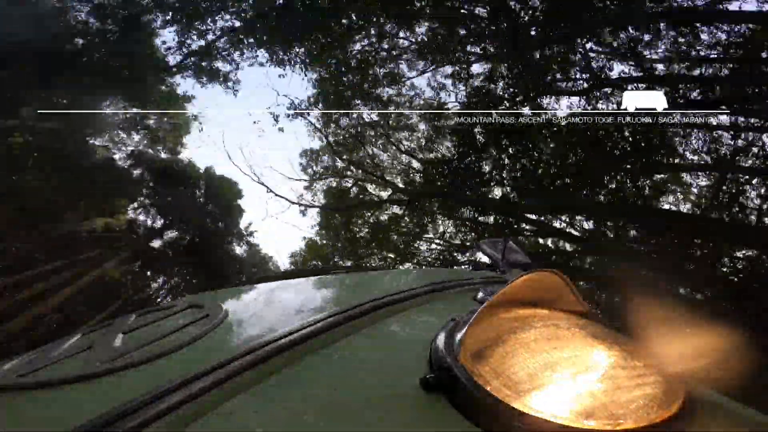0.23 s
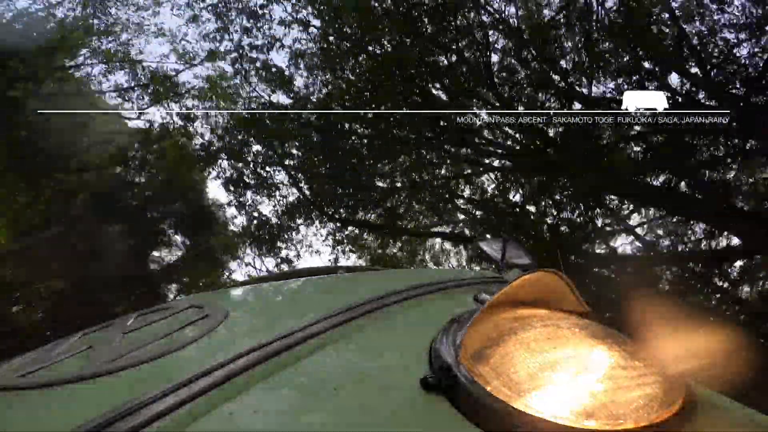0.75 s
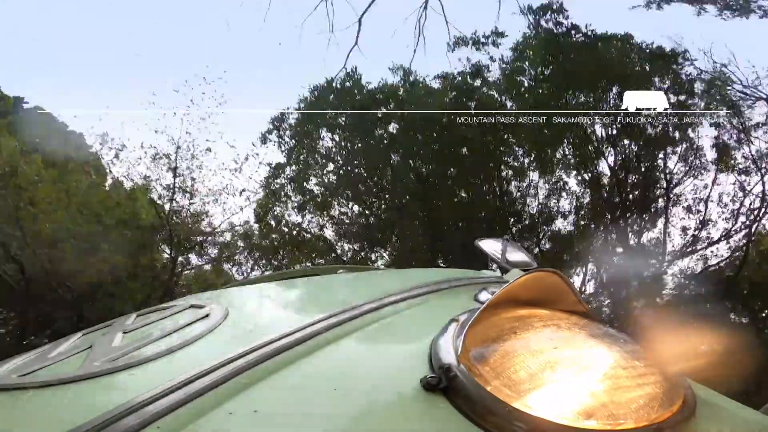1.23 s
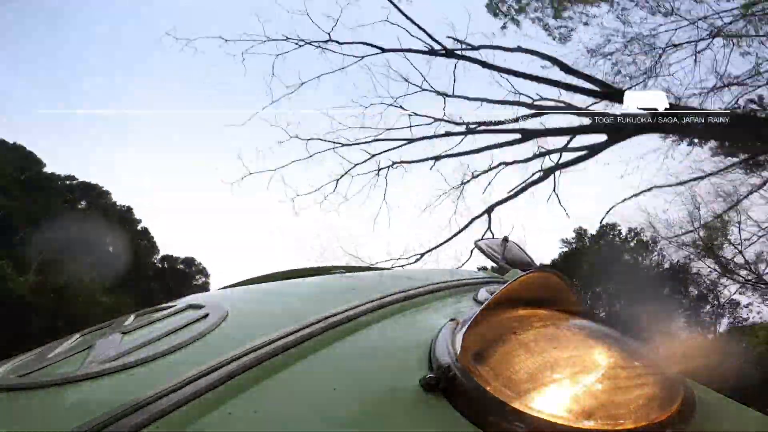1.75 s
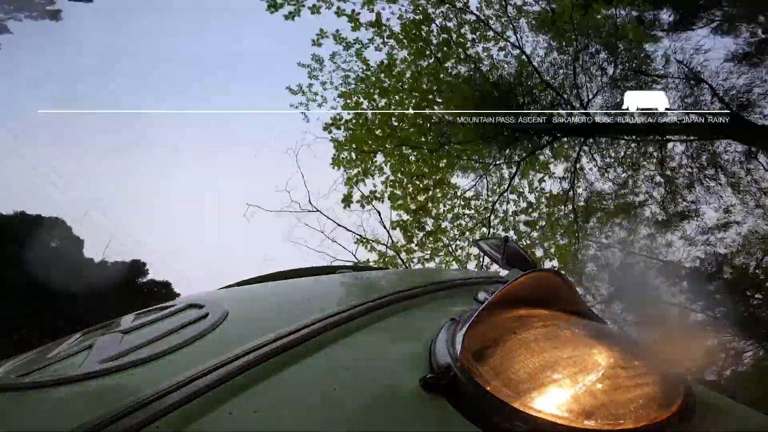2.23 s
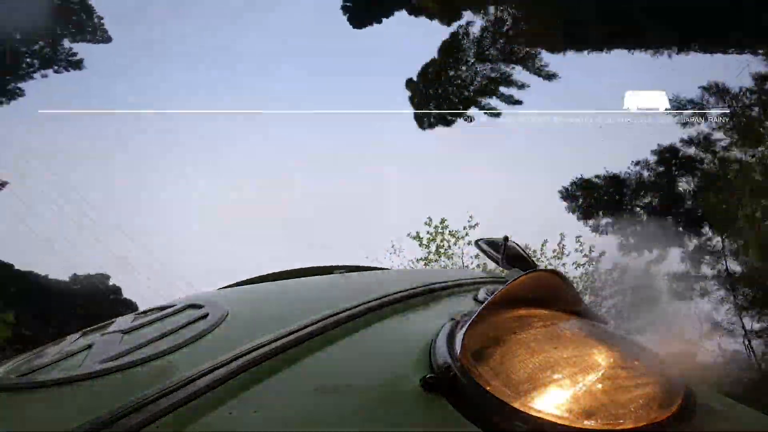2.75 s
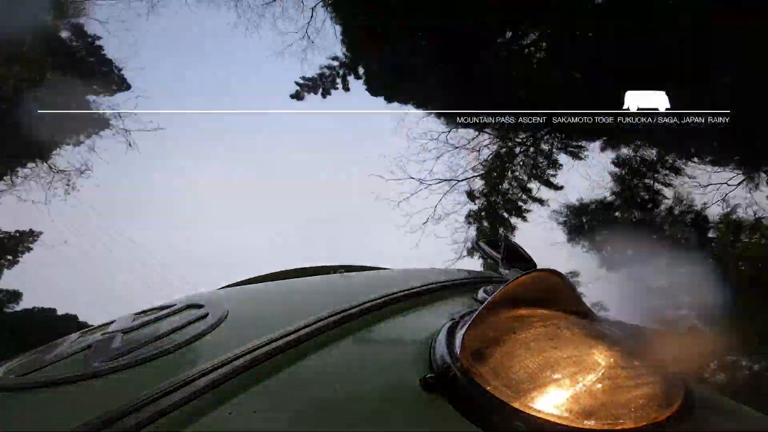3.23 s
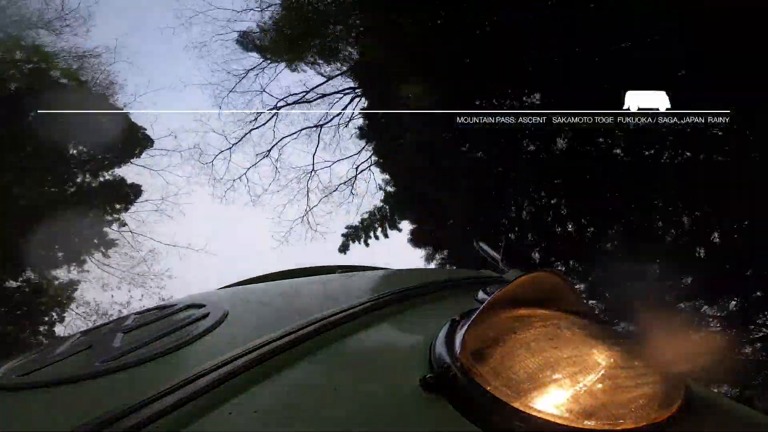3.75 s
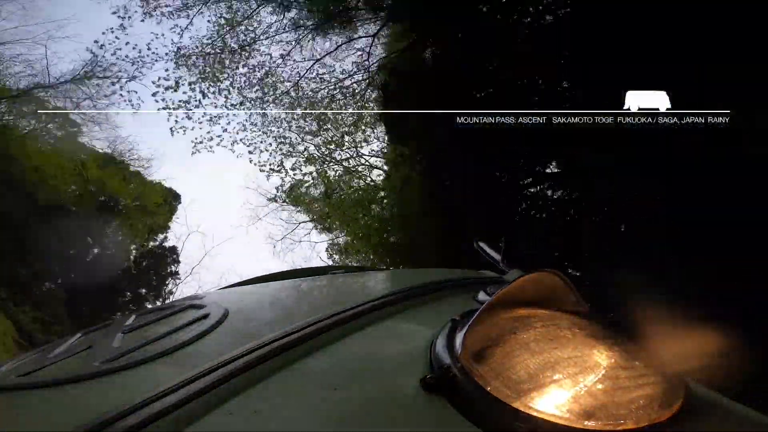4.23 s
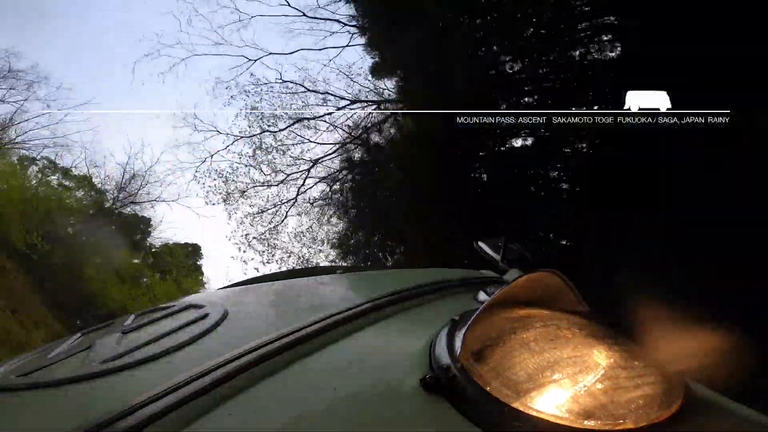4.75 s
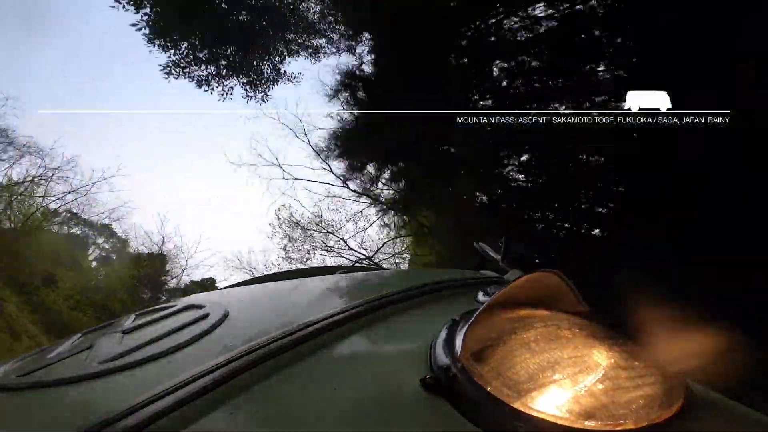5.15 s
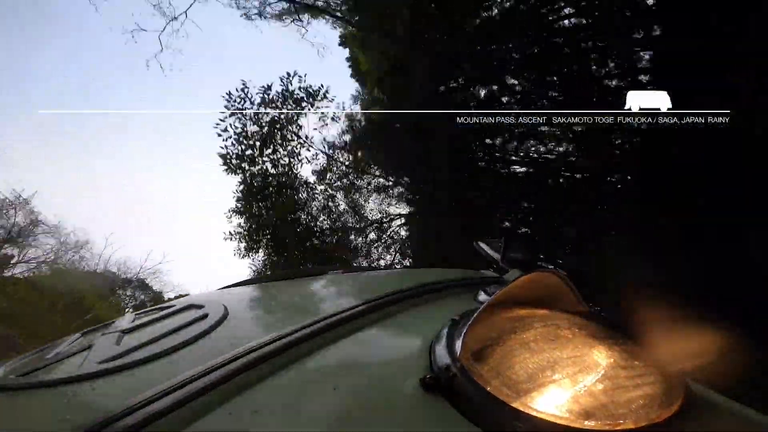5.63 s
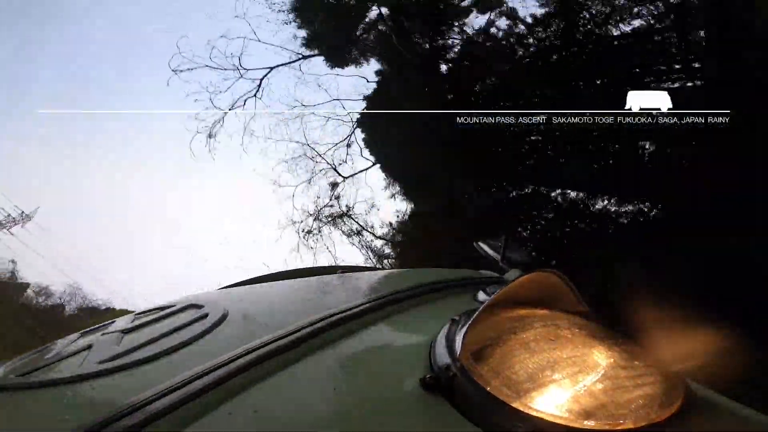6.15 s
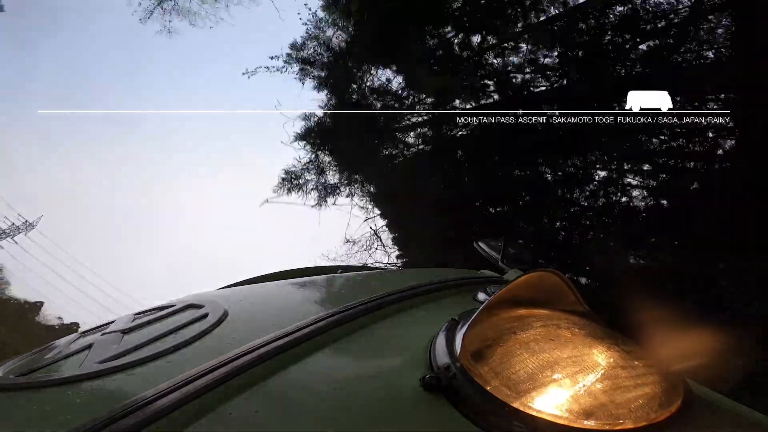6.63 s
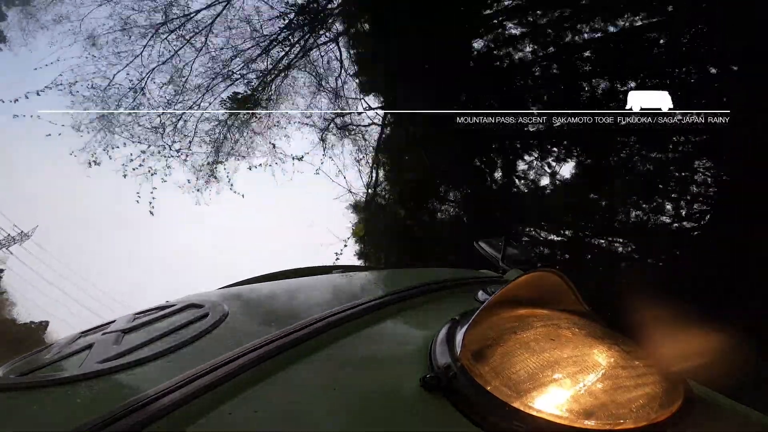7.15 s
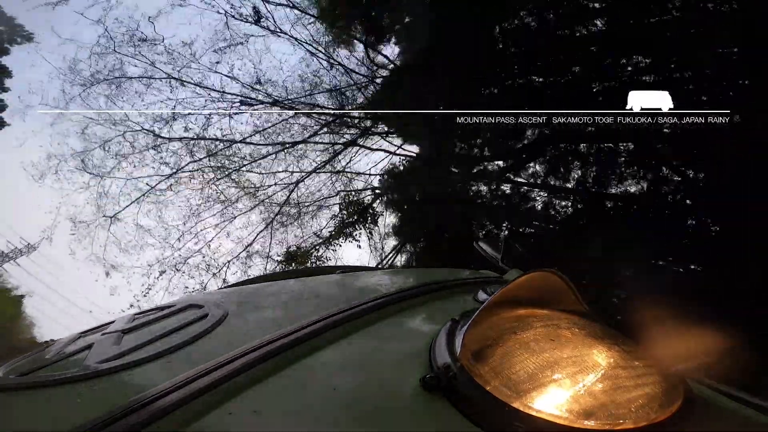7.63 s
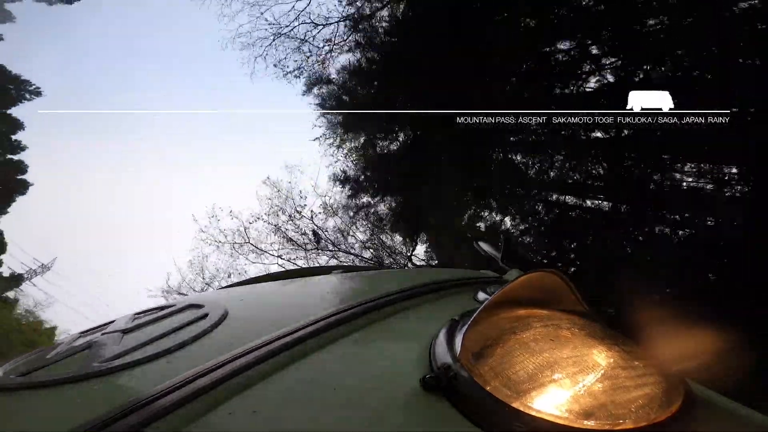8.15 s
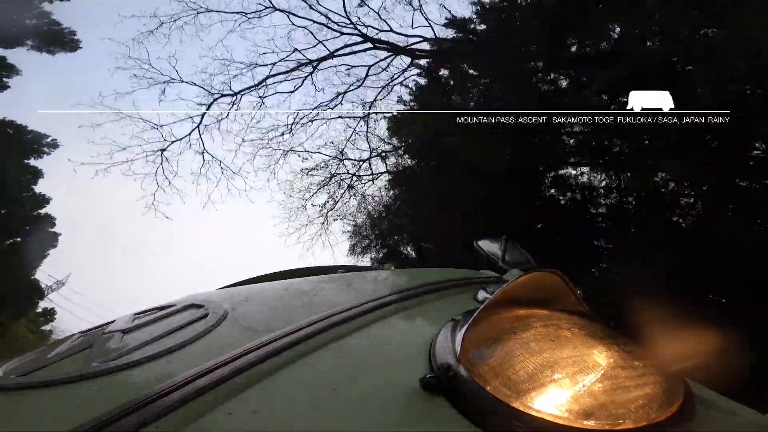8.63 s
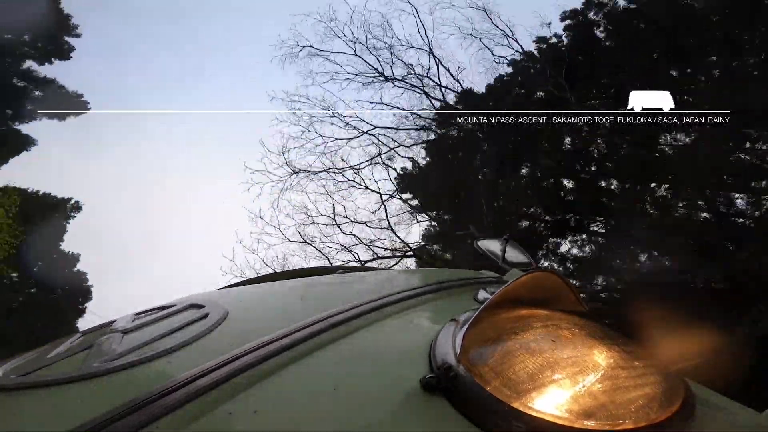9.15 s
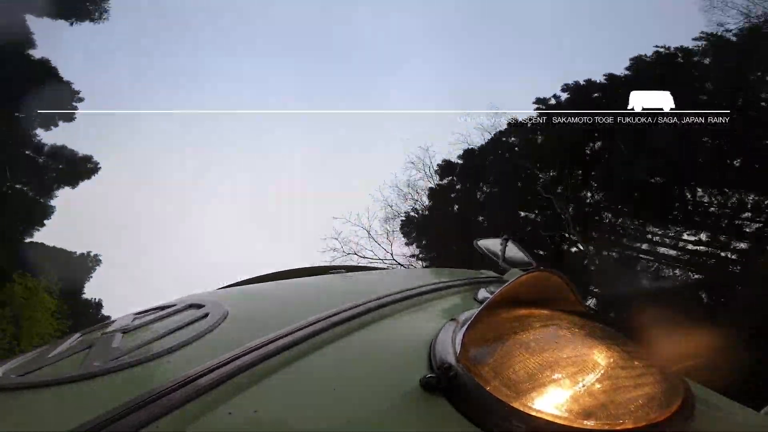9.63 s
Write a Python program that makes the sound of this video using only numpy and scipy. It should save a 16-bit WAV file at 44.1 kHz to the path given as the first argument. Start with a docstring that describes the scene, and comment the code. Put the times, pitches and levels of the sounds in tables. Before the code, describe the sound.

An old air-cooled bus drives along a mountain road, heard from its nose with the engine at the far end. The engine drones and pulls hard for a second, then a loud, dull driveline knock comes as the throttle shuts. The revs sink through a burble until the engine lugs, with separate muffler thumps, rhythmic chuffs from a leaky exhaust and light ticking. Fan and tyre rush and road rumble run underneath.

```python
"""Old bus on a mountain road

Microphone at the nose, a bus length from the air-cooled flat four. It coasts, pulls hard for a second,
then the revs sink until it lugs and gently bucks: the exhaust burbles, its drone breaks into muffler
thumps, and one cylinder bank chuffs through a leaky joint once a turn, over the rush of fan and tyres.
A driveline knock as the throttle shuts ducks the recorder's limiter."""
import sys
import numpy as np
from scipy import signal
from scipy.fft import rfft, irfft, next_fast_len
from scipy.io import wavfile
from scipy.ndimage import uniform_filter1d, map_coordinates

SR = 44100
rng = np.random.default_rng(int(sys.argv[2]) if len(sys.argv) > 2 else 0)


def pcm_store(signal):
    """Save signal as 16-bit PCM."""
    levels = np.round(np.clip(np.atleast_2d(signal), -1, 1) * 32767)
    wavfile.write(sys.argv[1], SR, levels.astype(np.int16).T)


N = 435692
T = np.arange(N) / SR


def from_db(db):
    """Decibels to gain."""
    return 10 ** (np.asarray(db) / 20)


def rms_one(x):
    """Scale to unit power."""
    return x / np.sqrt(np.mean(x ** 2) + 1e-20)


def even(x, size=12000):
    """Hold unit power over every stretch of a few engine turns."""
    return x / np.sqrt(uniform_filter1d(uniform_filter1d(x ** 2, size), size // 2) + 1e-12)


def in_time(rows):
    """Each column of a timed curve at every sample."""
    times, *columns = np.transpose(rows)
    return [np.interp(T, times, column) for column in columns]


def drift(rate):
    """Smooth random wander of spread 1 that changes about rate times a second."""
    wander = map_coordinates(rng.standard_normal(8192), [T[::20] * rate + 2], order=3, mode="wrap")
    return rms_one(wander).repeat(20)[:N]


def coloured(spectrum):
    """Noise of unit power with the given spectrum, rolled off beyond its ends."""
    hz, level_db = np.transpose(spectrum)
    size = next_fast_len(N)
    f = np.arange(1, size // 2 + 2) * SR / size
    skirts = 1 / (1 + (hz[0] / f) ** 4) / (1 + (f / (2 * hz[-1])) ** 4)
    gain = from_db(np.interp(np.log(f), np.log(hz), level_db)) * skirts
    return rms_one(irfft(rfft(rng.standard_normal(size)) * gain, size)[:N])


def resonate(x, modes):
    """Ring parallel resonances with alternating signs."""
    out = 0
    for k, (hz, width_hz, level_db) in enumerate(modes):
        r = np.exp(-np.pi * width_hz / SR)
        poles = [1, -2 * r * np.cos(2 * np.pi * hz / SR), r * r]
        ring = signal.lfilter([1, 0, -1], poles, x + 1e-18) * (1 - r * r) / 2
        out = out + (-1) ** k * from_db(level_db) * ring
    return out


def band(x, low_hz, high_hz):
    """Gentle band-pass."""
    return signal.sosfilt(signal.butter(2, [low_hz, high_hz], "band", fs=SR, output="sos"), x)


def puffs(crank, strength_db, delay, width, scatter_db):
    """One smooth puff a firing, of its cylinder's strength plus chance; delay and width in firings."""
    angle = crank - delay + .5
    stroke = np.floor(angle).astype(int)
    chance_db = scatter_db * np.clip(rng.standard_normal(1024), -2, 2)
    shape = np.exp(-.5 * ((angle - stroke - .5) / width) ** 2)
    return shape * from_db(np.take(strength_db, stroke, mode="wrap") + chance_db[stroke])


def linger(flow, tail_s, share):
    """A share of the energy echoes on between the underbody and the road."""
    r = np.exp(-1 / (tail_s * SR))
    echo = signal.lfilter([1 - r], [1, -r], flow ** 2)
    return np.sqrt((1 - share) * flow ** 2 + share * echo)


def jolts(events, modes, decay_s, trim_db, size=6000):
    """Each jolt is a short, dying burst of noise that rings the given resonances."""
    out, envelope = np.zeros(N + size), np.exp(-T[:size] / decay_s)
    for time_s, level_db in events:
        ring = resonate(rng.standard_normal(size) * envelope, modes)
        start = int(time_s * SR)
        out[start:start + size] += from_db(level_db + trim_db) * np.std(envelope) * rms_one(ring)
    return out[:N]


# Low, gusty rumble at the microphone: (frequency [Hz], relative density [dB])
RUMBLE_SPECTRUM = [(15, -17), (30, 3), (45, -2), (70, -0.5), (110, -9.5), (300, -31.5)]


def rumble(load, swell_db):
    """A low rumble gusts, swelling with the tyre rush and dipping under load."""
    return from_db(-22 - 4.5 * load + .74 * swell_db) * coloured(RUMBLE_SPECTRUM)


# Running gear under the floor: (time [s], pitch [Hz], level [dB])
HOWL_TRACK = [(0, 950, -41), (.4, 925, -48), (.55, 925, -35), (.65, 916, -51), (1.6, 919, -47),
              (2.3, 920, -48), (3.2, 873, -43), (4.3, 842, -41), (5.6, 811, -49), (6.5, 773, -54)]


def howl(width_hz=55):
    """A breathy howl of the running gear sinks as the bus slows."""
    hz, level_db = in_time(HOWL_TRACK)
    angle = 2 * np.pi * np.cumsum(hz) / SR
    return from_db(level_db) * (drift(width_hz) * np.cos(angle) + drift(width_hz) * np.sin(angle))


# Gears, faint from the nose: (time [s], pitch [Hz], level [dB])
WHINE_TRACK = [(0, 2020, -33.5), (.12, 1925, -36), (.35, 1845, -41), (.6, 1810, -48), (4, 1780, -58)]


def whine(wobble_rad=.25):
    """A thin, unsteady gear whine falls and fades."""
    hz, level_db = in_time(WHINE_TRACK)
    angle = 2 * np.pi * np.cumsum(hz) / SR
    return from_db(level_db - drift(40)) * np.sin(angle + wobble_rad * drift(60))


# Air over the fins at the far end of the bus: (frequency [Hz], relative density [dB])
AIR_SPECTRUM = [(2000, -20), (2800, 17.5), (3350, 4.5), (3900, 9.5), (4700, 3.5), (5600, 5.5), (7200, 1),
                (10000, -5.5), (12500, -3), (15500, -13)]


def cooling_air(load, lugging, swell_db, treble_db, flutter_db=3.5):
    """Air hisses over the fins and swells with the fan; its share of the treble peaks when coasting."""
    share_db = -1.5 - 7 * lugging ** 2 - 6.5 * load + .56 * swell_db
    return from_db(treble_db + share_db + flutter_db * drift(150)) * coloured(AIR_SPECTRUM)


# Fan and tyre rush at the microphone: (time [s], level [dB])
RUSH_TRACK = [(0, -30.5), (.45, -31), (.9, -33), (1.65, -30), (1.9, -32.5), (2.4, -29.5), (3.1, -26.5),
              (3.7, -29), (4.3, -31.5), (5.7, -33.5), (6.8, -33.5), (8, -34.5), (9.5, -36), (9.8, -35)]
# Its colour from the nose: (frequency [Hz], relative density [dB])
RUSH_SPECTRUM = [(300, 6), (480, -1.5), (620, -6), (740, -4.5), (980, -0.5), (1120, -6), (1300, -5.5),
                 (1650, -10.5), (1800, -6.5), (2300, -13), (2850, -12), (3300, -19.5), (4500, -19.5),
                 (9000, -32.5)]


def fan_and_tyres(crank, load, rush_db, throb=.042, flutter_db=.9):
    """Fan and tyres rush, throbbing a little with the crank and pulsing at every firing under load."""
    beat = np.exp(throb * puffs(crank, CHUFF_DB, delay=.19, width=.18, scatter_db=7))
    pulse_db = 1.7 * load * np.cos(2 * np.pi * (crank - .35))
    rush = coloured(RUSH_SPECTRUM) * beat * from_db(pulse_db + flutter_db * drift(120))
    return from_db(rush_db + 1) * even(rush)


# Thuds through the body behind the microphone, the first as the throttle opens: (time [s], relative level [dB])
BODY_THUDS = [(0.508, -4), (3.725, -6), (6.427, -8), (9.687, -14), (9.729, -16)]


def thuds():
    """Thuds jolt the body, ringing its shell, panels and exhaust."""
    return jolts(BODY_THUDS, BODY_MODES + PANEL_MODES + BURBLE_MODES, decay_s=.01, trim_db=-7)


# The eight valves in turn: (relative tick level [dB])
VALVE_TICKS_DB = [0, -4, -2, -11, -9, -16, 3, -11]
# Ring of the valve gear: (frequency [Hz], width [Hz], gain [dB])
VALVE_MODES = [(4770, 250, 12), (5540, 350, 9), (7350, 200, -9), (11500, 400, -23)]


def tappets(crank, lugging, treble_db):
    """Valve gear ticks unevenly with a thin ring, twice a firing, standing out as the revs fall."""
    ticks = puffs(2 * crank, VALVE_TICKS_DB, delay=.24, width=.1, scatter_db=1.8)
    hiss = coloured(HISS_SPECTRUM)
    ring = from_db(-4) * rms_one(resonate(rng.standard_normal(N), VALVE_MODES))
    ticking = linger(ticks, tail_s=.0055, share=1) * (hiss + ring)
    return from_db(treble_db - 17.5 + 6 * lugging) * even(ticking)


def tinware_rattle(crank, rush_db):
    """Strong firings knock the engine's tinware."""
    blows = puffs(crank, CHUFF_DB, delay=.83, width=.07, scatter_db=1.2)
    tin = band(rng.standard_normal(N), 845, 1520)
    return from_db(rush_db - 10.5) * rms_one(linger(blows, tail_s=.0067, share=.52) * tin)


# Clacks that carry from the engine bay: (time [s], relative level [dB])
TIN_CLACKS = [(1.141, -18), (3.725, -19.5), (4.1699, -29), (5.0226, -25.5), (6.5841, -25), (7.504, -24),
              (7.9704, -22), (9.1468, -19), (9.2216, -22), (9.7289, -18.5)]
# Sheet metal around the engine: (frequency [Hz], width [Hz], gain [dB])
TIN_MODES = [(1240, 200, 2), (1550, 160, -1.5), (1920, 400, -14)]


def tinware_clacks():
    """Now and then the tinware gives one loud clack."""
    return jolts(TIN_CLACKS, TIN_MODES, decay_s=.0055, trim_db=-3.5)


def driveline_knock(time_s=2.0795, width_s=.0015):
    """One dull, full-scale knock as the gears take up their slack."""
    swing = ((T - time_s) / width_s) ** 2
    return (swing - 1) * np.exp(-swing / 2)


# Shell and panels between engine and microphone: (frequency [Hz], width [Hz], gain [dB])
BODY_MODES = [(143.7, 47, -5), (215.1, 25.3, 0), (271, 59, -9)]
PANEL_MODES = [(369, 28, 0.5), (428.7, 31.4, 0), (487, 18, -8)]


def boom(crank, lugging, level_db, modes, turbulence=.11):
    """Gas blows, each with its own turbulence, shake the given resonances."""
    blows = puffs(crank + .004 * drift(40), THUMP_DB, delay=.6, width=.025, scatter_db=.7)
    gusts = puffs(crank, THUMP_DB, delay=.57, width=.18, scatter_db=.7)
    swirl = (turbulence * gusts + .028) * rms_one(band(rng.standard_normal(N), 72, 700))
    # only slow firings land as separate blows; faster ones merge into a roar
    shake = resonate(.35 * lugging ** 2 * blows + swirl, modes)
    return from_db(level_db) * even(band(shake, 130, 480))


# Hollow notes of the exhaust: (frequency [Hz], width [Hz], gain [dB])
BURBLE_MODES = [(238, 24, 6), (312, 32, -5)]


def burble(crank, firing_hz, load, peak_hz=48, span_hz=10):
    """With the throttle shut and the revs sinking, one bank burbles in the exhaust."""
    overrun = (1 - load) * np.exp(-.5 * ((firing_hz - peak_hz) / span_hz) ** 2)
    blows = puffs(crank + .04 * drift(40), BURBLE_DB, delay=.5, width=.04, scatter_db=1.5)
    gusts = puffs(crank, BURBLE_DB, delay=.5, width=.3, scatter_db=1.5) * rng.standard_normal(N)
    return from_db(-26) * overrun * even(band(resonate(blows + gusts, BURBLE_MODES), 168, 580))


# Pops from the tail of the bus: (time [s], relative level [dB])
EXHAUST_POPS = [(1.825, -1), (2.339, -15), (2.557, -5), (2.631, -15), (3.472, -6), (3.622, -7),
                (4.834, -16), (5.578, -16), (6.711, -25), (7.378, -15), (8.583, -10), (9.364, -8.5)]


def pops():
    """Pops in the exhaust ring its hollow notes and the panels."""
    return jolts(EXHAUST_POPS, BURBLE_MODES + PANEL_MODES, decay_s=.0056, trim_db=-9)


# The exhaust pipe and the rasp of its joint: (frequency [Hz], width [Hz], gain [dB])
PIPE_MODES = [(1310, 360, 0), (2550, 186, 8), (3700, 98, 4), (3880, 116, 4), (5120, 720, -5.5),
              (6530, 200, -2.5), (6880, 180, -8), (7780, 510, -5)]
RASP_MODES = [(2650, 210, 0), (4200, 270, 0)]
# Dull chuff and brighter hiss, heard along the underbody: (frequency [Hz], relative density [dB])
CHUFF_SPECTRUM = [(500, -7), (1200, 10.5), (2200, 5.5), (3200, 3.5), (4400, 2), (6000, -0.5), (8000, -4),
                  (10500, -3), (12200, -9.5), (15500, -15)]
HISS_SPECTRUM = [(500, 3), (1200, 9.5), (2200, 6.5), (3200, 5), (4400, 4), (6000, -1), (8000, -1),
                 (12000, -4.5), (15500, -11)]


def leak(crank, load, lugging, treble_db, ring_change_db=2.5):
    """Gas spits from a joint: a rasp at each firing under load, a chuff from one bank when lugging."""
    chuff = puffs(crank, CHUFF_DB, delay=.74, width=.105, scatter_db=.9)
    chuff = linger((.3 + .7 * lugging) * chuff, tail_s=.011, share=.6)
    spit = puffs(crank, SPIT_DB, delay=.3, width=.13, scatter_db=1.2)
    spit = linger(load * spit, tail_s=.004, share=.6)
    # each mode wanders in level, so every chuff rings differently
    rings = sum(resonate(rng.standard_normal(N), [mode]) * from_db(ring_change_db * drift(15))
                for mode in PIPE_MODES)
    ringing = from_db(-.5) * lugging ** 2 * rms_one(rings)
    rasp = from_db(-7) * load * rms_one(resonate(rng.standard_normal(N), RASP_MODES))
    gas = chuff * (coloured(CHUFF_SPECTRUM) + ringing) + spit * (coloured(HISS_SPECTRUM) + rasp)
    grit = from_db(drift(450))
    return from_db(treble_db + .5) * even(gas * grit)


# The leaky joint's loudest chuffs, from the far end of the bus:
# (time [s], relative crack level [dB], ring pitch [Hz], relative ring level [dB])
LOUD_CHUFFS = [(3.7245, -22, 3900, -29), (4.1699, -21, 2560, -31), (4.653, -34, 3150, -26),
               (4.771, -40, 3900, -31), (4.8938, -26, 3650, -23), (5.017, -30, 3900, -34),
               (5.637, -24, 3900, -27), (5.888, -36, 3850, -30), (6.644, -30, 2550, -27),
               (7.3048, -27, 3850, -45), (7.702, -32, 2550, -24), (7.767, -40, 3900, -29),
               (8.098, -33, 3830, -29), (8.235, -28, 2520, -27), (8.577, -40, 3950, -25),
               (8.648, -34, 2560, -22), (8.856, -36, 3900, -28), (8.932, -37, 2580, -27),
               (9.142, -32, 3830, -31), (9.216, -32, 3800, -31), (9.358, -35, 3850, -28),
               (9.651, -28, 3830, -25), (9.795, -29, 2550, -25)]


def loud_chuffs(ring_width_hz=110):
    """The strongest chuffs from the leaky joint are each a sharp crack that rings the pipe."""
    cracks = jolts([row[:2] for row in LOUD_CHUFFS], PIPE_MODES, decay_s=.006, trim_db=-4)
    rings = sum(jolts([(time_s, ring_db)], [(hz, ring_width_hz, 0)], decay_s=.0044, trim_db=-3)
                for time_s, _, hz, ring_db in LOUD_CHUFFS)
    return band(cracks + rings, 840, 13000)


# Relative cylinder strengths in firing order: (thump [dB], chuff [dB], spit [dB], burble [dB])
CYLINDER_STRENGTHS = [(-7, -21, -4, -15), (0, 0, 0, 0), (-6, -30, -3, -15), (-1, -2, -4, -5)]
THUMP_DB, CHUFF_DB, SPIT_DB, BURBLE_DB = np.transpose(CYLINDER_STRENGTHS)
# The muffler, a bus length away: (frequency [Hz], width [Hz], gain [dB])
MUFFLER_MODES = [(57.6, 31.4, -2.5), (73.4, 21.2, -6)]


def muffler_thumps(crank, firing_hz, lugging, surge, early_firings=.072, stall_hz=31.4):
    """At low revs each firing rings the muffler on its own; the weak bank's gas arrives early."""
    uneven = crank + early_firings * np.sin(np.pi * crank / 2) ** 2
    pulses = puffs(uneven, THUMP_DB, delay=1, width=.08, scatter_db=.8)
    stir = .015 * rms_one(band(rng.standard_normal(N), 30, 300))
    ring = band(resonate(pulses + stir, MUFFLER_MODES), 31.8, 150)
    # the thumps swell and sag as the bus bucks, and weaken near a stall
    level_db = -15.5 + 1.5 * surge - .4 * np.maximum(stall_hz - firing_hz, 0)
    return np.sqrt(np.minimum(1.24 * lugging, 1)) * from_db(level_db) * even(ring)


# The tailpipe heard from the nose, throttle shut: (firing rate [Hz], level [dB])
TAILPIPE_RESPONSE = [(27, -19.5), (32, -17), (37, -16.5), (44, -13), (54, -9.5), (66, -9.5), (72, -10.5),
                     (82, -17.5)]
# Its overtones at full load: (multiple of the firing rate, level [dB])
DRONE_OVERTONES = [(1.5, -36.5), (2, -22.5), (3, -23.5), (3.5, -39.5), (4, -29.5), (5, -38), (6, -41)]


def exhaust_drone(crank, firing_hz, load, lugging, coast_buzz=.26):
    """Pressure swings at the firing rate, loudest where the pipe resonates; load steepens it to a buzz."""
    level_db = np.interp(firing_hz, *np.transpose(TAILPIPE_RESPONSE)) + 1.16 * load
    waver_db = .24 * (.5 - 1.1 * load) * drift(30)
    pressure = from_db(level_db + waver_db) * np.cos(2 * np.pi * (crank - .914 - .051 * lugging))
    buzz = (coast_buzz + (1 - coast_buzz) * load) * (1 - lugging)
    for order, overtone_db in DRONE_OVERTONES:
        wave = -np.cos(2 * np.pi * order * (crank - .3176))
        pressure += buzz * from_db(overtone_db - drift(30.05)) * wave
    return np.sqrt(2) * pressure


def bucking(firing_hz, below_hz=37.4, fade_hz=3.7, crest_s=4.66, period_s=.425):
    """Slow surge of the lugging engine, between -1 and 1."""
    depth = np.clip((below_hz - firing_hz) / fade_hz, 0, 1)
    return depth * np.cos(2 * np.pi * (T - crest_s) / period_s)


# Engine speed along the road: (time [s], firing rate [Hz])
ENGINE_SPEED = [(0.0, 82.23), (0.13, 74.78), (0.44, 65.33), (0.67, 63.08), (1.73, 70.47), (2.02, 67.29),
                (2.5, 53.5), (2.88, 47.0), (3.94, 35.92), (4.5, 32.8), (6.4, 31.66), (7.19, 29.9),
                (7.84, 30.34), (8.26, 29.43), (9.61, 27.1), (9.88, 28.22)]
# The throttle: (time [s], load [0-1])
ENGINE_LOAD = [(0, .4), (.5, .35), (.56, 1), (1.77, 1), (1.87, .35), (2.06, .5), (2.35, 0)]


def scene():
    """Engine and road meet at one microphone on the nose; the crank times the engine's pulses."""
    firing_hz, = in_time(ENGINE_SPEED)
    load, = in_time(ENGINE_LOAD)
    rush_db, = in_time(RUSH_TRACK)
    surge = bucking(firing_hz)
    crank = np.cumsum(firing_hz) / SR - .014 * surge   # counted in firings
    lugging = np.clip((56 - firing_hz) / 19, 0, 1)   # firings separate as the revs fall
    swell_db = rush_db - rush_db.mean()
    body_db = -27.5 - 2 * load + .94 * swell_db + .5 * surge
    panel_db = -35.5 + 2 * load + swell_db
    treble_db = -39 + 2.5 * load + .095 * swell_db + 1.7 * np.log2(firing_hz / firing_hz.mean())
    mix = exhaust_drone(crank, firing_hz, load, lugging)
    mix += muffler_thumps(crank, firing_hz, lugging, surge)
    mix += boom(crank, lugging, body_db, BODY_MODES)
    mix += burble(crank, firing_hz, load) + pops()
    mix += boom(crank, lugging, panel_db, PANEL_MODES)
    mix += leak(crank, load, lugging, treble_db)
    mix += tappets(crank, lugging, treble_db) + tinware_rattle(crank, rush_db)
    mix += fan_and_tyres(crank, load, rush_db) + cooling_air(load, lugging, swell_db, treble_db)
    mix += thuds() + tinware_clacks() + rumble(load, swell_db)
    mix += loud_chuffs() + driveline_knock() + whine() + howl()
    return mix[None]


def limiter(x, release_db_per_s=1.5):
    """A peak over full scale pulls the gain down at once; it creeps back."""
    over_db = 20 * np.log10(np.maximum(np.abs(x), 1))
    recovery_db = release_db_per_s * T
    return x * from_db(recovery_db - np.maximum.accumulate(over_db + recovery_db, axis=-1))


def record(dry):
    """The recorder limits the peaks and cuts the top above 15.8 kHz."""
    top_cut = signal.ellip(10, .1, 90, 15800, fs=SR, output="sos")
    return signal.sosfilt(top_cut, limiter(dry))


dry = scene()
out = record(dry)
pcm_store(out)
```